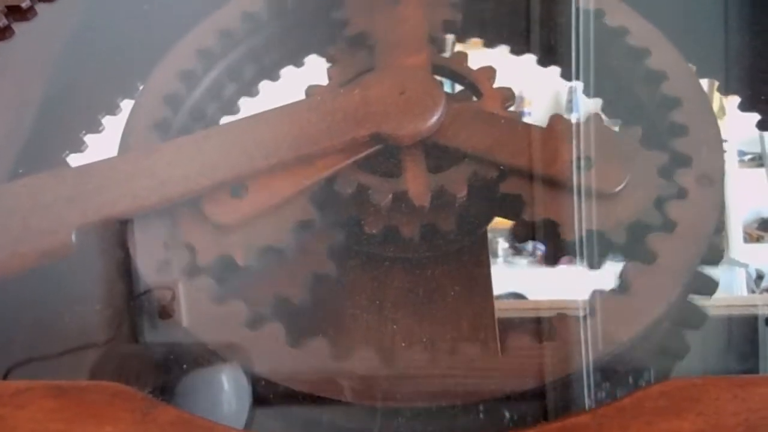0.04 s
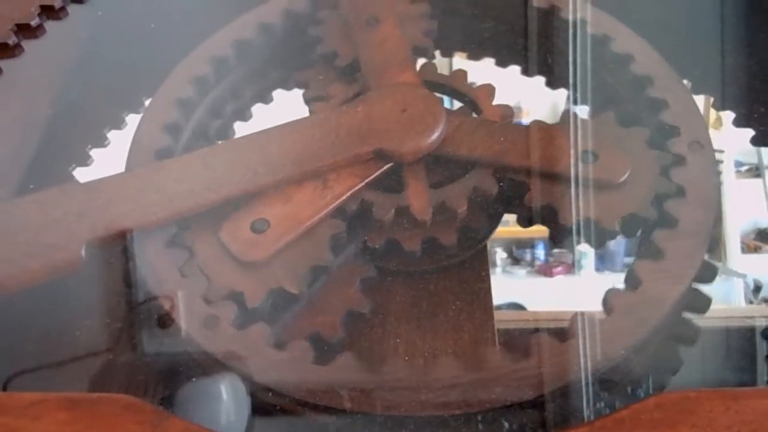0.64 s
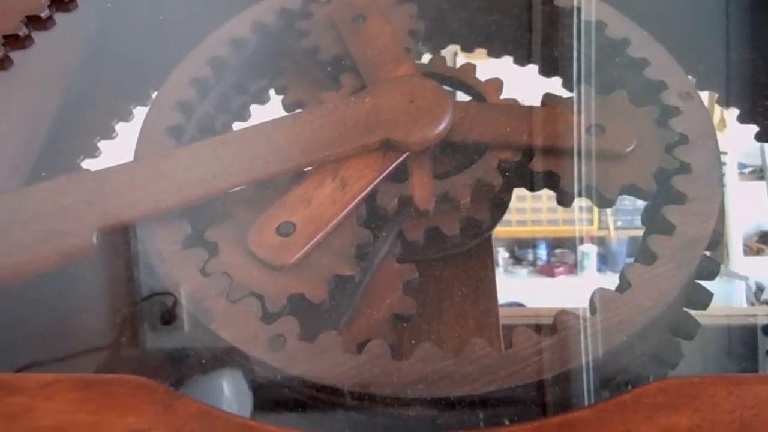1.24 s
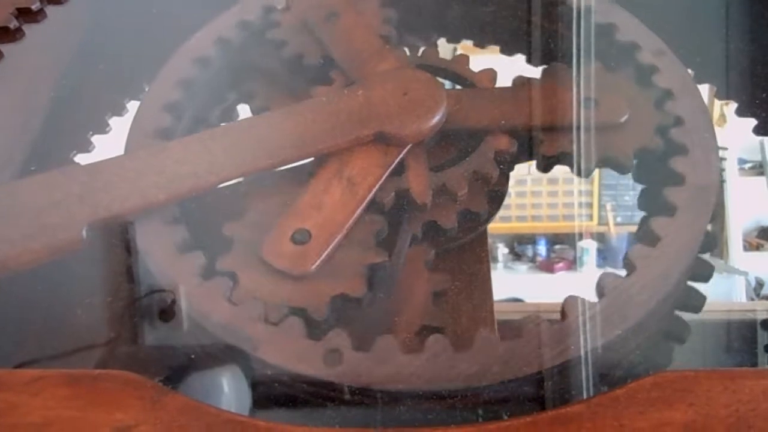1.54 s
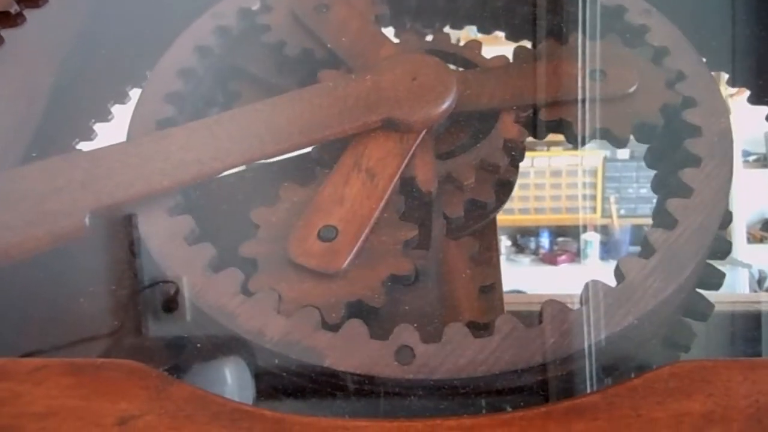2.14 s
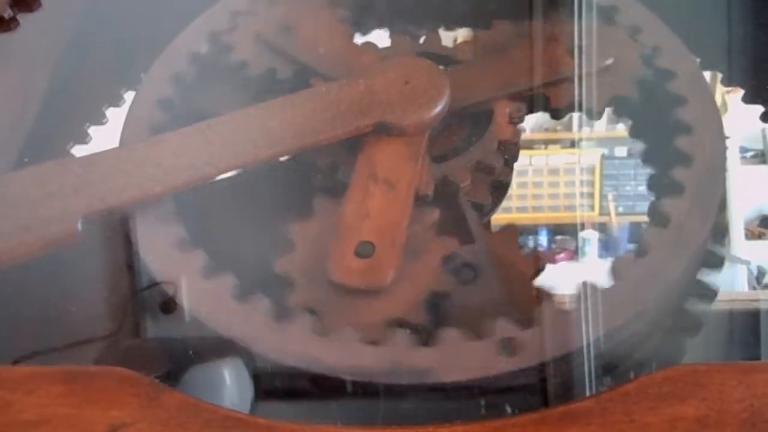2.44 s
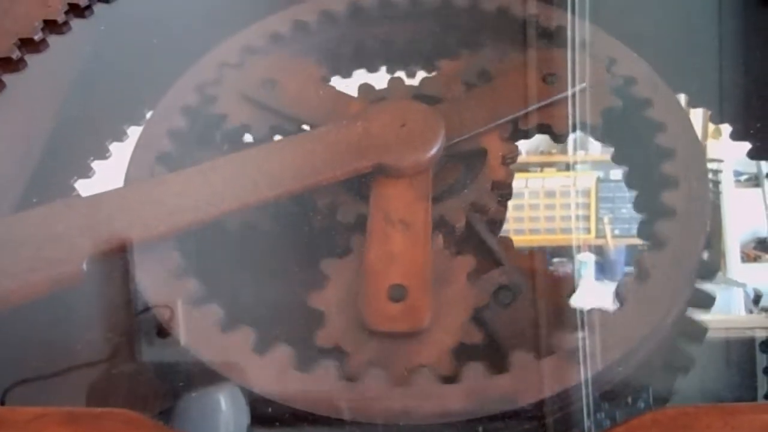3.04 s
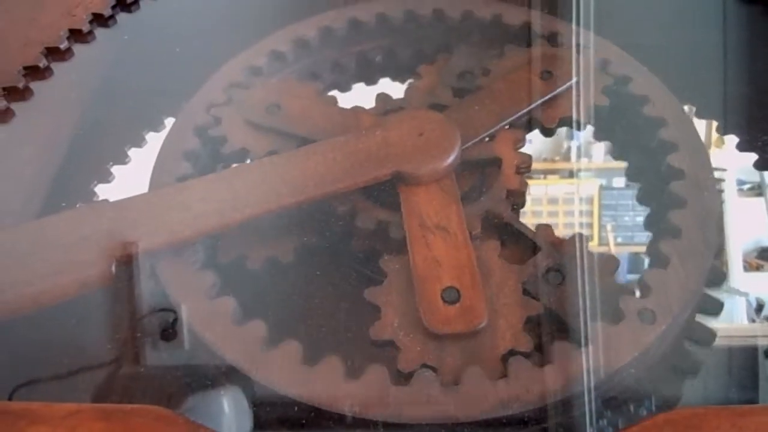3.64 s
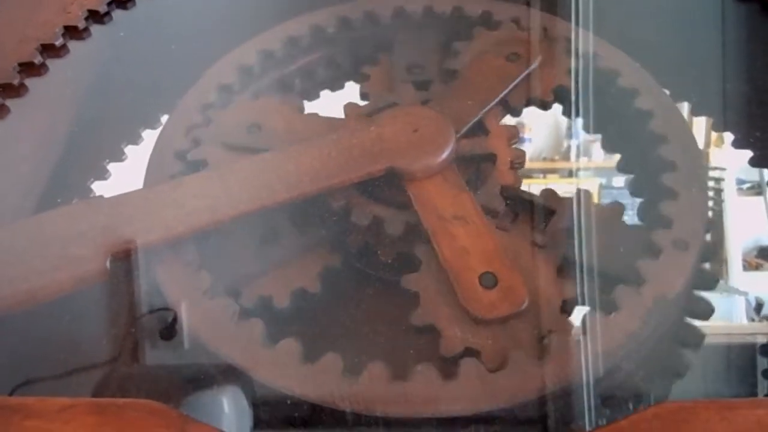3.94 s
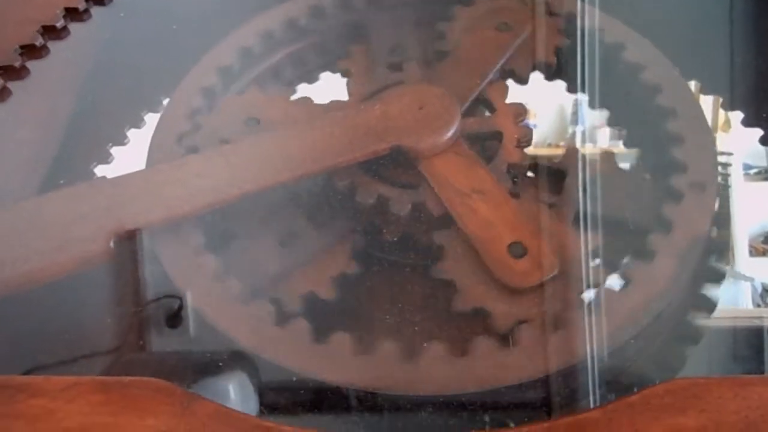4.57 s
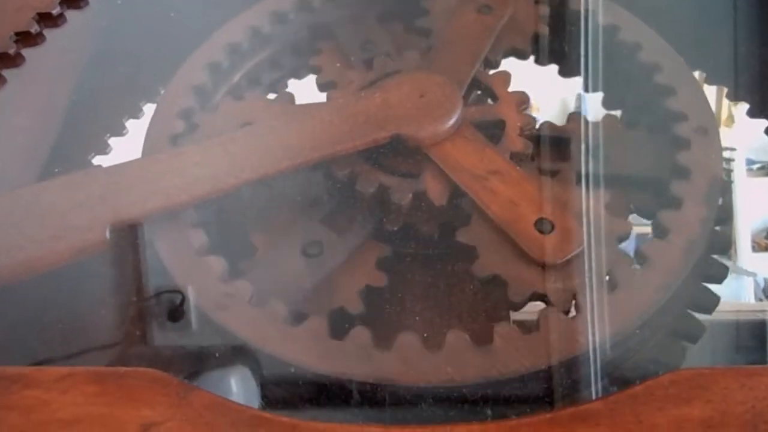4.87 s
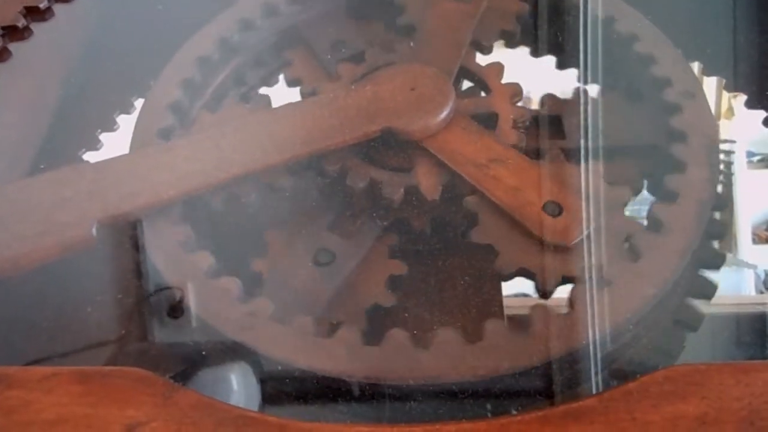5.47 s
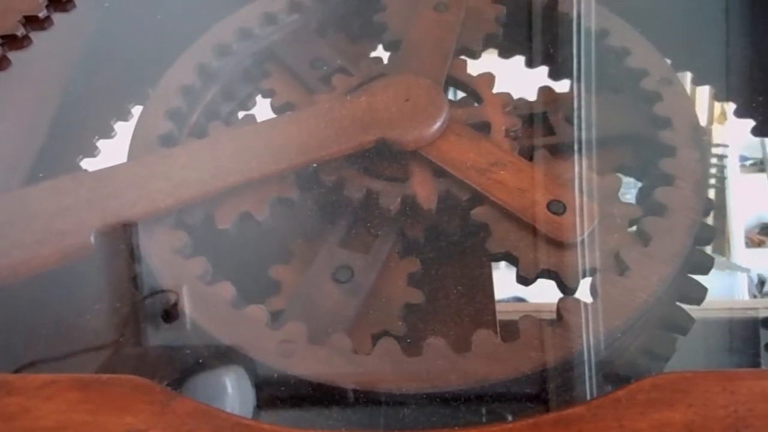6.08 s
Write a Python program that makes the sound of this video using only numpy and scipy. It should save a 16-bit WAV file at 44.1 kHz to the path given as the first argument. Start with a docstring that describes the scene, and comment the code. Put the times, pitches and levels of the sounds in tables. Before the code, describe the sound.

Wooden gears turn in fits and starts, close by in a small quiet room. A grainy swish and a soft thud open the sound. Short rubbing strokes and low thuds keep coming irregularly, with tiny bright scuffs that almost squeak. A firm hollow knock with a dry tick lands at about 1.4 seconds. A sharper click comes near 2.3, a rub and a snap at 2.6, and another firm knock at 2.8, followed by a lighter one at 3. Softer swishes and bumps continue until a cluster of knocks at about 4.4, 4.5 and 4.8 seconds, the last with a bright snap. One more firm knock rattles briefly at 5.3. The rubbing then dies down, and a light knock comes at about 6.2. Each impact has a short dull room tail. A soft rumble, hiss, faint hum and thin whirr lie underneath throughout.

```python
"""A grainy swish and a soft thud open the sound of wooden planetary gears turned in fits and starts.
Sliding friction makes the swish; tooth tips scuff by stick and slip, and stuck teeth snap free.
As the play between the teeth is taken up, impacts excite the modes of tooth, wheel and frame,
heard as knocks and thuds. A small room reflects it all, over a soft rumble, hiss, hum and whirr."""
import sys
import numpy as np
from scipy import signal
from scipy.fft import rfft, irfft, next_fast_len
from scipy.io import wavfile
from scipy.ndimage import uniform_filter1d

SR = 44100
rng = np.random.default_rng(int(sys.argv[2]) if len(sys.argv) > 2 else 0)


def transcribe(u):
    """Save the signal u as a 16-bit wav file named by the first command-line argument.

    u: samples, shape (n,) or (channels, n), limited to [-1, 1]; the rate is SR.
    q: integer samples, one column per channel.
    """
    v = np.clip(np.atleast_2d(u).T, -1, 1)
    q = np.round(v * 32767).astype(np.int16)
    wavfile.write(sys.argv[1], SR, q)


N = 278271
T = np.arange(N) / SR


def undb(db):
    """Amplitude ratio of a level in decibels."""
    return 10 ** (np.asarray(db) / 20)


def unit(x):
    """Normalisation to rms 1."""
    return x / np.sqrt(np.mean(x ** 2))


def blow(x, db):
    """Energy normalisation: packed into a hundredth of a second, the sound would have this level."""
    return x * undb(db) / np.sqrt(np.sum(x ** 2) / (SR / 100))


def colour(x, points):
    """Spectral shaping by (Hz, dB) points, interpolated over log frequency."""
    hz, db = np.transpose(points)
    size = next_fast_len(len(x))
    bin_hz = np.maximum(np.fft.rfftfreq(size, 1 / SR), 1)
    gain = undb(np.interp(np.log(bin_hz), np.log(hz), db))
    return irfft(rfft(x, size) * gain, size)[:len(x)]


def add(track, s, x):
    """Superposition of a short sound on a track, starting at s seconds."""
    i = max(int(s * SR), 0)
    track[i:i + len(x)] += x[:N - i]


def walk(per_s):
    """Slow random modulation: smoothed random steps with a spread near 1."""
    hold = int(SR / per_s)
    steps = np.repeat(rng.standard_normal(N // hold + 1), hold)
    return 1.3 * uniform_filter1d(uniform_filter1d(steps, hold), hold)[:N]


def bump(hz, centre_hz, octaves):
    """Broad resonance curve: the gain is one half at this many octaves from the centre."""
    return 1 / (1 + (np.log2(hz / centre_hz) / octaves) ** 2)


def resonate(x, hz, width_hz):
    """Two equal resonators in cascade give a band with steep sides; rms 1."""
    peak = signal.iirpeak(hz, hz / width_hz, fs=SR)
    return unit(signal.lfilter(*peak, signal.lfilter(*peak, x)))


def grains(per_s, spread_db):
    """Shot noise: fibres catch and let go in dense tiny clicks of uneven size."""
    clicks = (rng.random(N) < per_s / SR) * rng.choice([-1, 1], N)
    return unit(clicks * undb(spread_db * np.minimum(rng.exponential(size=N), 4)))


def contact(s, swell_s, ease_s, shape=1.58):
    """Contact force on a sliding tooth, greatest at time s; shape 1 is pointed, 2 a bell."""
    return np.exp(-np.maximum((s - T) / swell_s, (T - s) / ease_s) ** shape)


def rubbing(wood_gain_db=2.0, hiss_gain_db=-1, sheen_db=-51, firm_db=-47, wood_stretch=1.03, lag_s=0.0044):
    """Sliding friction: coarse catches drum on the wheel, fine ones hiss, a firm push adds sheen."""
    # One tooth slides over another. Each row: time of firmest contact, swell and ease of the hiss,
    # all in seconds, then relative levels of wood and hiss in dB.
    slides = [(.035, 0.13, 0.08, -49.5, -52.5), (.19, 0.041, 0.097, -44.5, -49.5),
              (.345, .02, 0.047, -53, -72), (.715, 0.039, .06, -49.5, -56), (.83, 0.045, .07, -50.5, -59),
              (.935, 0.078, 0.083, -50.5, -52.5), (1.505, .045, 0.054, -45.5, -49.5),
              (1.61, .04, 0.04, -56, -73), (1.755, 0.05, 0.032, -44, -46.5), (1.89, 0.059, 0.04, -52, -58),
              (2.33, 0.056, .04, -51.5, -55.5), (2.445, 0.064, 0.06, -48, -52),
              (2.597, 0.071, 0.022, -44.5, -46), (3.065, 0.04, 0.08, -52.5, -55.5),
              (3.22, 0.062, 0.067, -44.5, -50), (3.271, 0.027, 0.02, -49, -48.5),
              (3.775, 0.05, 0.088, -48.5, -54.5), (3.975, 0.066, 0.057, -43.5, -47.5),
              (4.556, 0.034, 0.031, -42, -47), (4.728, 0.043, 0.037, -41.5, -45.5),
              (4.87, 0.02, 0.078, -51, -57.5), (5.39, 0.052, 0.084, -54, -60),
              (5.57, 0.053, 0.056, -48, -55.5)]
    # Spectra of the wood, the hiss and the sheen. Each row: frequency in Hz, gain in dB.
    wood_spectrum = [(60, -22), (130, 5), (260, 3.5), (350, 3.5), (470, -5), (670, -1.5), (1000, -9.5),
                     (1250, -7.5), (1800, -18.5), (2300, -15), (3500, -34), (8000, -55)]
    hiss_spectrum = [(1000, -24), (2000, 4), (2700, 1), (3300, 6), (4300, 3.5), (5100, -4.5), (6200, -4.5),
                     (7300, -7), (9200, -5.5), (10300, -12), (11500, -4), (14500, -29)]
    sheen_spectrum = [(3000, -40), (6000, 3), (9500, -3), (10350, 9.5), (11300, -1), (12800, 8),
                      (14500, -6)]
    wood_force, hiss_force = np.zeros((2, N))
    for s, swell_s, ease_s, wood_db, hiss_db in slides:
        wood_force += undb(wood_db) * contact(s, wood_stretch * swell_s, wood_stretch * ease_s)
        hiss_force += undb(hiss_db) * contact(s, swell_s, ease_s)
    pressure = walk(70)  # the uneven grain of the wood
    coarse = unit(colour(grains(per_s=1200, spread_db=3) * undb(0.72 * pressure), wood_spectrum))
    fine = unit(colour(grains(per_s=7000, spread_db=1.5) * undb(1.2 * pressure), hiss_spectrum))
    sheen = unit(colour(grains(per_s=4400, spread_db=2.0) * undb(0.8 * pressure), sheen_spectrum))
    grip = np.interp(T - lag_s, T, hiss_force) / undb(firm_db)  # tightens a moment after the push
    wood = undb(wood_gain_db) * wood_force * coarse
    hiss = undb(hiss_gain_db) * hiss_force * fine
    return wood + hiss + undb(sheen_db) * grip ** 1.6 * sheen


def air(rumble_db=-53.0, hiss_db=-57.5, hum_db=-65, hum_hz=100):
    """Ambient noise: mains hum, with room rumble and hiss widened by an uncorrelated side signal."""
    # Spectra of rumble, hiss, and side against mid. Each row: frequency in Hz, gain in dB.
    rumble_spectrum = [(12, -37), (26, -5), (45, -8.5), (102, -11.5), (202, -13.5), (306, -15.5),
                       (424, -17.5), (597, -21.5), (972, -23), (1500, -30), (2500, -58)]
    hiss_spectrum = [(700, -41), (1200, 2), (1550, 0.5), (1850, -1), (2200, 0), (2800, -0.5), (3600, -4),
                     (4700, -3), (6000, -5.5), (10000, -7), (14500, -8)]
    side_spectrum = [(30, -12.5), (200, -7), (1000, -3.5), (2300, -2), (4500, -0.5), (12000, 0)]
    def noise():
        rumble = unit(colour(rng.standard_normal(N), rumble_spectrum)) * undb(rumble_db + 0.76 * walk(10))
        hiss = unit(colour(rng.standard_normal(N), hiss_spectrum)) * undb(hiss_db + 0.16 * walk(2.8))
        return rumble + hiss
    hum = unit(np.sin(2 * np.pi * hum_hz * T)) * undb(hum_db + 2.8 * walk(2.56))
    mid = noise() + hum
    side = colour(noise(), side_spectrum)
    return np.array([mid + side, mid - side])


def whirr(hz=2220, width_hz=380, db=-66, waver_db=1.0):
    """Narrow-band noise, amplitude-modulated: a faint whirr wavers in the background."""
    return resonate(rng.standard_normal(N), hz, width_hz) * undb(db - waver_db * walk(10))


def ring(modes, centre_hz, octaves, rise_s, scatter_db, detune):
    """Modal response to a blow: damped sines, the place of contact favouring those near a centre."""
    hz, db, t60 = np.transpose(modes)[:, :, None]
    t = T[:SR // 4]
    share, shift, phase = rng.standard_normal((3, len(modes), 1))
    gain = undb(db + scatter_db * share) * bump(hz, centre_hz, octaves)
    waves = np.sin(2 * np.pi * (hz * (1 + detune * shift) * t + phase))
    decay = np.exp(-np.log(1000) * t / t60)
    return np.sum(gain * waves * decay, axis=0) * (1 - np.exp(-(t / rise_s) ** 2))


def knocks(hard_db=-35, bounce_s=0.003, bounce_hz=1090, loose_db=7.5):
    """Impact excitation: the tooth clicks, the wheel rings and chatters, and hard blows bounce once."""
    # Tooth strikes tooth. Each row: start in seconds, wheel level in dB, wheel centre in Hz,
    # tooth level in dB, tooth centre in Hz, chatter in dB relative to the wheel.
    impacts = [(.033, -52, 450, -65, 3300, -12), (.588, -54, 600, -56, 3440, -12),
               (.6943, -52.5, 1600, -49.5, 2280, -12), (1.1, -49, 754, -68, 2400, -18),
               (1.3859, -30, 470, -38.5, 2920, -13.5), (2.257, -49, 750, -46, 3700, -14),
               (2.2655, -47.5, 850, -38, 4000, -12), (2.8095, -60, 900, -52, 3940, -14),
               (2.816, -31, 780, -38, 2800, -23), (2.970, -43, 740, -43, 4000, -10),
               (3.653, -50, 660, -54, 3450, -12), (4.075, -48, 570, -58, 2200, -13),
               (4.427, -33.5, 560, -49, 2500, -12.5), (4.543, -36.5, 624, -49, 2420, -17),
               (4.821, -38.5, 690, -48.5, 3360, -15), (5.310, -33.5, 537, -44.5, 2500, -10),
               (6.22, -45, 594, -63, 3300, -10)]
    # Modes of the wheels with their frame, and of a single tooth.
    # Each row: frequency in Hz, relative level in dB, time to decay by 60 dB in seconds.
    wheel_modes = [(253.6, 0.5, 0.095), (338, 4.5, 0.04), (448, -6, 0.022), (590, 6, 0.036),
                   (675, -6.5, 0.044), (766, -9, 0.092), (910, 1, 0.026), (1110, 2, 0.023),
                   (1207, 4.5, 0.027), (1373, -0.5, 0.039), (1574, -22.5, 0.014), (1598, -6, 0.06),
                   (2220, 11, 0.014), (2340, -24, .02)]
    tooth_modes = [(1894, 6, 0.017), (2060, 2.5, 0.015), (2314, 1, 0.041), (2500, 6, 0.013),
                   (2800, -3.5, 0.046), (3110, 3, 0.013), (3290, 6.5, 0.016), (3610, 4.5, 0.015),
                   (4000, 3.5, 0.026), (4410, 5, 0.017)]
    out = np.zeros(N)
    def strike(s, wheel_db, wheel_hz, tooth_db, tooth_hz, chatter_db):
        wheel = ring(wheel_modes, wheel_hz, octaves=0.73, rise_s=0.0023, scatter_db=3.5, detune=0.012)
        tooth = ring(tooth_modes, tooth_hz, octaves=0.66, rise_s=0.0011, scatter_db=3.0, detune=0.017)
        add(out, s, blow(wheel, wheel_db) + blow(tooth, tooth_db))
        add(out, s, blow(chatter(wheel_hz), wheel_db + chatter_db))
    for s, wheel_db, wheel_hz, tooth_db, tooth_hz, chatter_db in impacts:
        strike(s, wheel_db, wheel_hz, tooth_db, tooth_hz, chatter_db)
        if wheel_db > hard_db:
            # The harder the blow, the more comes back, though never all of it.
            bounce_db = wheel_db + min(-11 + 2 * (wheel_db - hard_db), -2)
            # The bounce lands on a brighter spot and shakes the wheel loose.
            strike(s + bounce_s, bounce_db, bounce_hz, tooth_db - 4, tooth_hz, chatter_db + loose_db)
    return out


def chatter(centre_hz, octaves=2.4, rise_s=0.0071, fall_s=0.041):
    """Rattle in a clearance: the loose wheel shakes on its axle, a noisy tail coloured like the blow."""
    # Spectrum of the rattle. Each row: frequency in Hz, gain in dB.
    rattle_spectrum = [(150, -13), (260, 7), (480, 0), (780, -2), (1000, -11), (1300, -4.5), (1600, -4.5),
                       (1850, -29), (3000, -16), (6000, -38)]
    t = T[:SR // 4]
    weighted = [(hz, db + 20 * np.log10(bump(hz, centre_hz, octaves))) for hz, db in rattle_spectrum]
    envelope = (1 - np.exp(-t / rise_s)) * np.exp(-t / fall_s)
    return colour(rng.standard_normal(len(t)), weighted) * envelope


def thuds(push_s=0.004, rise_s=0.0017, fall_s=0.023, gain_db=-6):
    """Soft impact excites low modes: the wheel swings briefly and the frame's crowded modes shudder on."""
    # A wheel drops into its play. Each row: start in seconds, relative level in dB, pitch in Hz.
    drops = [(0.034, -28, 239), (0.314, -33.5, 227), (0.357, -36.5, 230), (0.592, -36.5, 221),
             (0.812, -32, 168), (0.829, -34, 157), (0.935, -30.5, 351), (1.101, -40.5, 344),
             (1.387, -44, 314), (1.49, -33.5, 293), (1.526, -40, 143), (1.744, -36, 150), (1.756, -31, 285),
             (1.899, -40.5, 148), (2.26, -36, 256), (2.436, -35, 200), (2.593, -36, 310), (2.864, -40, 232),
             (2.977, -33, 360), (3.296, -31.5, 262), (3.65, -39, 377), (3.731, -36, 137), (3.758, -40, 244),
             (4.074, -33, 356), (4.484, -36.5, 237), (4.54, -31, 281), (4.552, -34, 130),
             (4.809, -30.5, 256), (5.051, -38.5, 260), (6.005, -46.5, 298), (6.218, -41.5, 252)]
    # Spectrum of the shuddering frame. Each row: frequency in Hz, gain in dB.
    frame_spectrum = [(70, -19), (140, -7), (240, 3), (350, 1), (470, -5.5), (620, -6.5), (900, -32),
                      (2000, -32), (6000, -51)]
    out, t = np.zeros(N), T[:SR // 6]
    push = np.exp(-(t / push_s - 2) ** 2 / 2) * (1 - np.exp(-2 * t / push_s))
    frame_envelope = (1 - np.exp(-(t / rise_s) ** 2)) * np.exp(-t / fall_s)
    for s, db, hz in drops:
        swing = np.sin(2 * np.pi * (hz * t + rng.random())) * push
        shudder = colour(rng.standard_normal(len(t)), frame_spectrum) * frame_envelope
        add(out, s, blow(swing, db + gain_db) + blow(shudder, db + gain_db))
    return out


def scuffs(edge_s=0.006, width_hz=620):
    """Stick-slip friction: short bright rasps, each catching one resonance and nearly squeaking."""
    # Tooth tips part. Each row: start and length in seconds, level in dB, squeak pitch in Hz,
    # squeak level in dB relative to the rasp.
    partings = [(0.253, 0.079, -62, 3250, 10), (0.299, 0.015, -47.5, 2970, -2),
                (0.328, 0.022, -56, 8300, -2), (1.017, 0.028, -52.5, 11400, -4),
                (1.875, 0.032, -49, 3300, -2), (1.945, 0.023, -58.5, 8250, -4),
                (2.676, 0.027, -51.5, 2930, 3), (3.37, 0.031, -48, 8200, -4),
                (4.039, 0.019, -51, 6200, -10), (4.159, 0.032, -52, 8100, -7), (5.015, .030, -56, 3920, -6)]
    # Spectrum of the rasp. Each row: frequency in Hz, gain in dB.
    rasp_spectrum = [(300, 1.5), (2400, -9), (3050, 3), (3800, 1), (5000, -4.5), (6200, -2.5), (7400, -7),
                     (9100, -7), (10400, -2), (12000, -4.5), (14500, -17.5)]
    out, t = np.zeros(N), T[:SR // 10]
    slips = grains(per_s=4000, spread_db=0.5) * undb(1.5 * walk(180))
    for s, length_s, db, hz, squeak_db in partings:
        rasp = unit(colour(slips[int(s * SR):][:len(t)], rasp_spectrum))
        squeak = undb(squeak_db) * resonate(rng.standard_normal(len(t)), hz, width_hz)
        envelope = np.clip(np.minimum(t, length_s + edge_s - t) / edge_s, 0, 1)
        add(out, s - edge_s / 2, undb(db) * envelope * unit(rasp + squeak))
    return out


def snaps(rise_s=0.0001, fall_s=0.0035):
    """Sudden release gives a broadband transient: a stuck tooth snaps free with a dry, bright tick."""
    # Teeth come free. Each row: start in seconds, level in dB.
    releases = [(0.303, -51), (0.814, -49), (1.387, -43), (2.2661, -42), (2.340, -46), (2.611, -40.5),
                (2.818, -41), (2.971, -50), (4.807, -35.5), (5.311, -52.5)]
    # Spectrum of the tick. Each row: frequency in Hz, gain in dB.
    tick_spectrum = [(1000, 4), (3000, 2), (5500, -6.5), (7200, 1.5), (9000, -4), (10600, 4.5), (12500, -8),
                     (14500, 7.5)]
    out, t = np.zeros(N), T[:SR // 30]
    envelope = (1 - np.exp(-t / rise_s)) * np.exp(-t / fall_s)
    for s, db in releases:
        tick = colour(rng.standard_normal(len(t)), tick_spectrum) * envelope
        add(out, s, blow(tick, db))
    return out


def echoes(x, t60_s, delay_s, corner_hz):
    """Convolution with decaying noise gives dense reflections, duller than the direct sound."""
    t = T[:SR // 2]
    tail = rng.standard_normal(len(t)) * np.exp(-np.log(1000) * t / t60_s) * (t > delay_s)
    lowpass = signal.butter(1, corner_hz, fs=SR, output="sos")
    response = signal.sosfilt(lowpass, tail / np.sqrt(np.sum(tail ** 2)))
    return signal.fftconvolve(x, response)[:N]


def room(x, wet_db=-12):
    """Reverberation: walls add a short dull tail; near surfaces spread the treble left and right."""
    # Side against mid for the near reflections. Each row: frequency in Hz, gain in dB.
    side_spectrum = [(100, -26), (500, -26), (1500, -20), (3500, -18), (7000, -5), (13000, -2)]
    mid = x + undb(wet_db) * echoes(x, t60_s=0.31, delay_s=0.012, corner_hz=2080)
    side = colour(echoes(mid, t60_s=0.016, delay_s=0.00088, corner_hz=18000), side_spectrum)
    return np.array([mid + side, mid - side])


def scene():
    """Superposition of the gears in their room and the background, in stereo."""
    gears = knocks() + thuds() + rubbing() + scuffs() + snaps()
    return room(gears) + air() + whirr()


def record(dry, top_hz=14350):
    """Microphone response: the right is a little fuller, the left brighter; the top is cut steeply."""
    # Channel balance. Each row: frequency in Hz, left minus right in dB.
    balance = [(100, -1), (1200, -1.1), (4000, -.2), (9000, 1.1)]
    left = colour(dry[0], [(hz, db / 2) for hz, db in balance])
    right = colour(dry[1], [(hz, -db / 2) for hz, db in balance])
    lowpass = signal.ellip(12, 0.1, 70, top_hz, fs=SR, output="sos")
    return signal.sosfilt(lowpass, [left, right])


dry = scene()
out = record(dry)
transcribe(out)
```